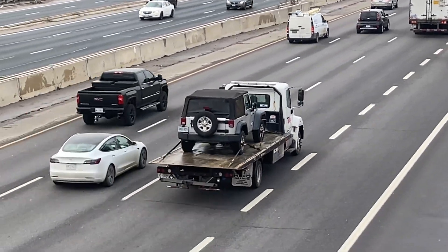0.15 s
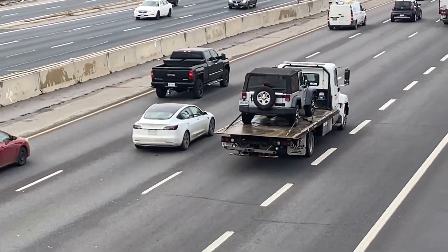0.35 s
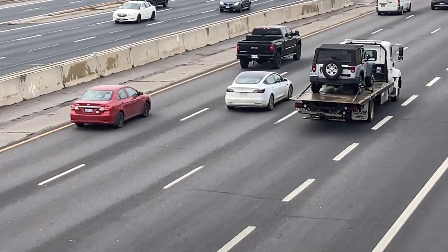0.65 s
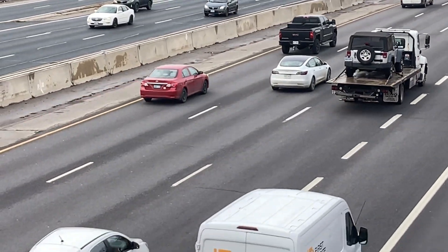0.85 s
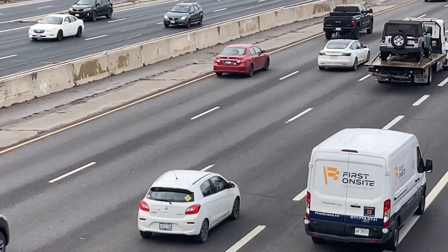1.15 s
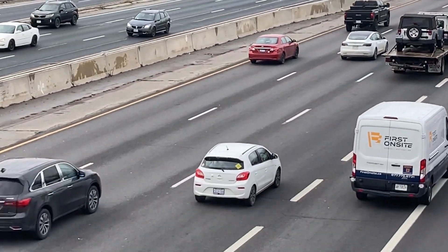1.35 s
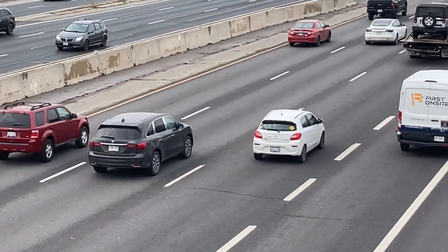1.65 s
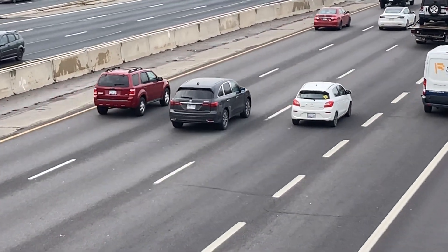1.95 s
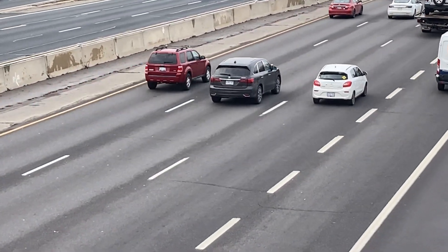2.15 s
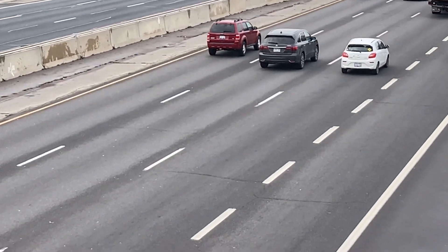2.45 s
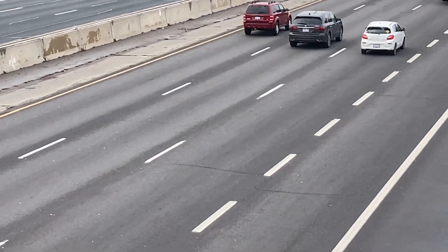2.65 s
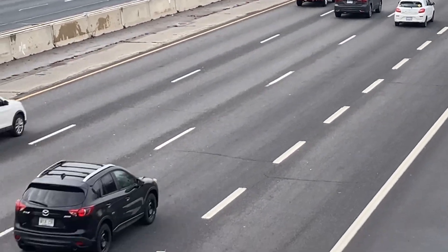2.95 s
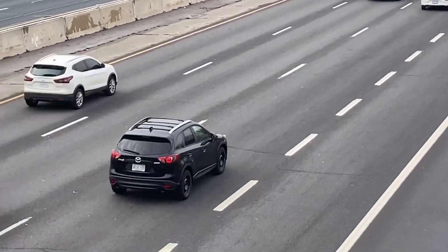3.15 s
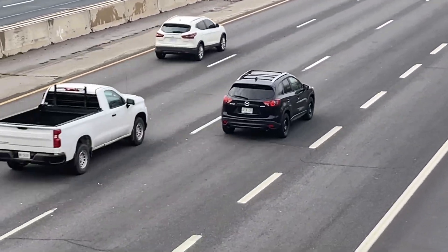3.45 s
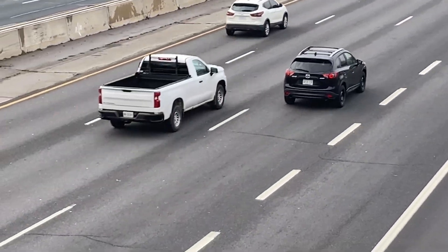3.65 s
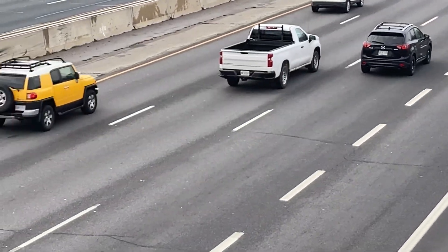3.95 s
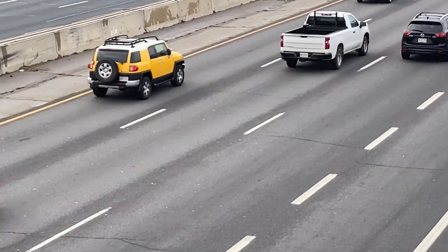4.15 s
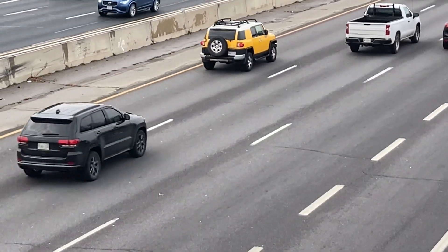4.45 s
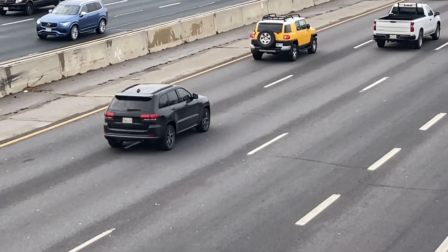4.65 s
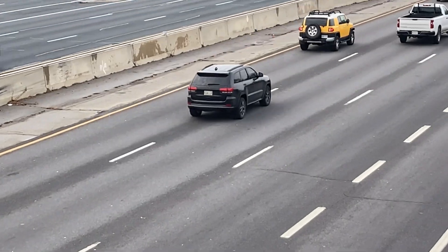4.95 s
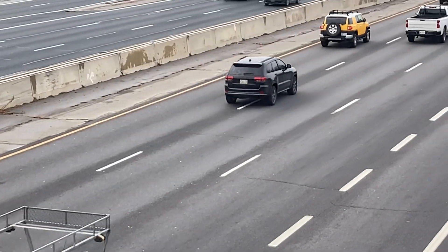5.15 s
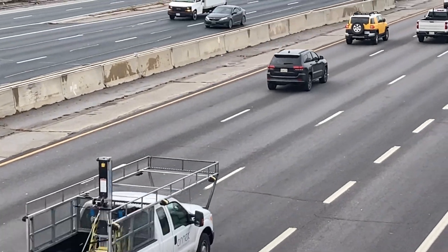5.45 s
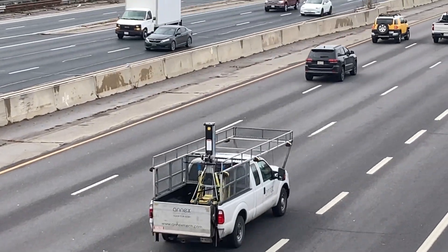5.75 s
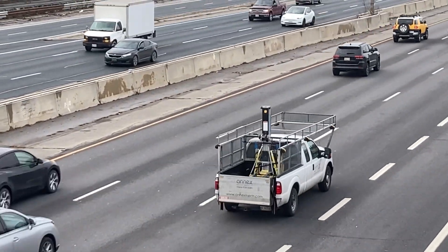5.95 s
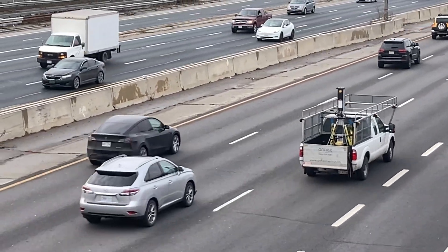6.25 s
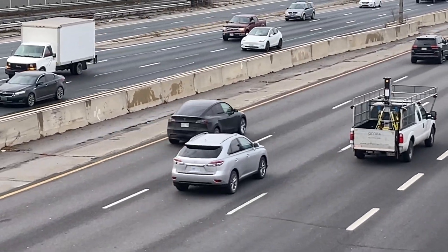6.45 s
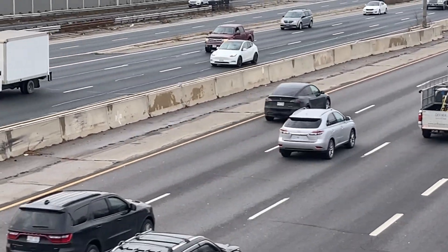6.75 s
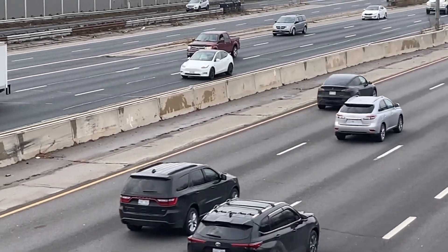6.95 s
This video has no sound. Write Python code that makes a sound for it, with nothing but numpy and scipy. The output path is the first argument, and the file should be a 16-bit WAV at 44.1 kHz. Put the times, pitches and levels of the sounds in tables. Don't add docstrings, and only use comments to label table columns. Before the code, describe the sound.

Cars rush past on a busy multi-lane highway over low exhaust rumble; a heavy truck drones away and a load rack bangs over a joint.

```python
import sys
import numpy as np
from scipy import signal
from scipy.fft import rfft, irfft, next_fast_len
from scipy.io import wavfile
from scipy.ndimage import uniform_filter1d, map_coordinates

SR = 44100
rng = np.random.default_rng(int(sys.argv[2]) if len(sys.argv) > 2 else 0)


def unload_audio(sound):
    columns = np.transpose(np.atleast_2d(sound))
    steps = np.round(np.clip(columns, -1, 1) * 32767)
    wavfile.write(sys.argv[1], SR, steps.astype(np.int16))


def voltage_ratio(level):
    return 10 ** (np.asarray(level, float) / 20)


N = 313110


def unit(x):
    return x / np.sqrt(np.mean(x ** 2) + 1e-20)


def along(points, hz):
    f, v = np.transpose(points)
    return np.interp(np.log(hz + 1), np.log(f + 1), v)


def curves(rows):
    s, *columns = np.transpose(rows)
    return [np.interp(np.arange(N) / SR, s, column) for column in columns]


def wobble(rate):
    knots = rng.standard_normal(int(N * rate / SR) + 4)
    return map_coordinates(knots, [np.arange(N) * rate / SR])


def filtered(x, response):
    m = next_fast_len(N + 8192)
    return irfft(rfft(x, m) * response(np.fft.rfftfreq(m, 1 / SR)), m)[..., :N]


def bell(t, s, span):
    return np.exp(-((t - s) / span) ** 2)


def swells(rows):
    t = np.arange(N) / SR
    return 10 * np.log10(1e-9 + sum(voltage_ratio(db) ** 2 * bell(t, s, span) for s, db, span in rows))


def rush(spectrum, patchy_db):
    z = signal.stft(rng.standard_normal((2, N)), nperseg=1024)[2]
    field = uniform_filter1d(rng.standard_normal(z.shape[1:]), size=10, axis=0)
    field = uniform_filter1d(field, size=6, axis=1)
    pair = signal.istft(z * voltage_ratio(patchy_db * unit(field)), nperseg=1024)[1][:, :N]
    closed = [(spectrum[0][0] / 2, -130), *spectrum, (spectrum[-1][0] * 2, -130)]
    return unit(filtered(pair, lambda hz: voltage_ratio(along(closed, hz))))


def drone(hz, orders, unsteady):
    turns = np.cumsum(hz * (1 + unsteady * wobble(12))) / SR
    tones = 0
    for order, db in orders:
        phase = 2 * np.pi * (order * turns + rng.random())
        tones = tones + np.sqrt(2) * voltage_ratio(db) * np.sin(phase)
    return tones


def struck(rows, attack):
    out, t = np.zeros(N + SR), np.arange(SR // 2) / SR
    for s, db, hz, t60 in rows:
        modes = [(0.92, 0.21), (1, 0.93), (1.07, 0.42)]
        ring = sum(gain * np.sin(2 * np.pi * ratio * hz * t) for ratio, gain in modes)
        envelope = voltage_ratio(db - 60 * t / t60) * (1 - np.exp(-(t / attack) ** 2))
        out[round((s - attack) * SR):][:len(t)] += envelope * ring
    return out[:N]


# (nearest t/s, level/dB, within earshot t/s, weight [-1.5 light to 1 heavy], tread [-1 fine
PASSES = [(0.0, 2, 0.13, 0.071, -0.31), (0.35, 3.5, 0.18, -0.53, 0.19), (0.65, -2, 0.17, -1.5, 0.52),
          (1.05, 1.5, 0.34, -0.28, -0.4), (1.47, -4.5, 0.032, 0, 0.42), (1.65, -3.5, .15, 0.42, -0.6),
          (2.05, -4, 0.17, 0.7, -0.17), (2.4, 0, 0.21, -0.27, -0.12), (2.7, -1, 0.16, -.5, -.4),
          (2.9, -1.5, 0.12, -0.67, .8), (3.3, 0, 0.27, -0.13, -.6), (3.6, 1.5, .15, 0.24, -0.24),
          (3.95, -6, 0.13, -0.15, 0), (4.4, -4, 0.16, 0.85, 1), (4.8, 2.5, 0.24, 0.7, .4),
          (5.1, -0.5, 0.13, 0.82, -.2), (5.45, 3, 0.21, 0.59, 0.22), (5.7, 2, 0.1, -0.059, -0.39),
          (5.9, -4.5, .1, -0.1, 0.083), (6.1, 1.5, 0.19, 0.021, -0.58), (6.4, 2, 0.13, 0.55, 0.23),
          (6.68, 0.5, 0.17, -0.36, 0.25), (7.0, 0, 0.26, 0.56, 0.89)]
LAYER_ANSWER = {"rumble": (-34.5, -38, 3.5, 0.1), "boom": (-33.5, -35.5, 4.5, -0.5),
                "carcass": (-31, -35, 4.5, -2), "tread": (-31.5, -32.5, 0, -4),
                "groove": (-28.5, -34, 0.4, 6.5), "hiss": (-41, -42.5, -4.5, -1.5),
                "air": (-75, -70.5, -2.5, -1.5)}


def traffic(layer):
    far_db, near_db, weight_db, tread_db = LAYER_ANSWER[layer]
    t = np.arange(0, N, 64)[:, None] / SR
    s, db, span, weight, tread = np.transpose(PASSES)
    vehicle_db = near_db + db + weight_db * weight + tread_db * tread
    near = voltage_ratio(vehicle_db) ** 2 * bell(t, s, span)
    level_db = 10 * np.log10(voltage_ratio(far_db) ** 2 + near.sum(axis=1))
    return np.interp(np.arange(N) / SR, t[:, 0], level_db)


# (f/Hz, level/dB per Hz)
AIR_SPECTRUM = [(7000, -30), (8500, -3), (9500, 0), (10500, -3), (11500, -9), (12500, -17), (13200, -28),
                (14000, -34), (16000, -70)]


def slipstream():
    level_db = traffic("air") + 3.5 + 0.8 * wobble(16)
    return voltage_ratio(level_db) * rush(AIR_SPECTRUM, patchy_db=2.4)


# (f/Hz, level/dB per Hz)
RUMBLE_SPECTRUM = [(20, -41.5), (33, -25), (40, -5.5), (48, 1.5), (70, 4), (130, 0), (200, 2), (260, -8.5),
                   (400, -57)]
BOOM_SPECTRUM = [(120, -74.5), (200, -4), (250, -0.5), (330, -2.5), (430, -9.5), (520, -14.5), (800, -61)]


def exhausts():
    rumble = voltage_ratio(traffic("rumble") + 6) * rush(RUMBLE_SPECTRUM, patchy_db=0)
    return rumble + voltage_ratio(traffic("boom")) * rush(BOOM_SPECTRUM, patchy_db=0.5)


# (f/Hz, level/dB per Hz)
BED_SPECTRUM = [(200, -31), (235, -3), (265, 4), (300, -6.5), (350, -30)]
# (t/s, level/dB, length t/s)
BED_SWELLS = [(4.93, -27, .07), (5.2, -31.5, .12), (5.45, -31, 0.13), (6.75, -36.5, .2)]


def load_bed():
    return voltage_ratio(swells(BED_SWELLS)) * rush(BED_SPECTRUM, patchy_db=1.5)


# (f/Hz, level/dB per Hz)
CARCASS_SPECTRUM = [(300, -35), (430, -9), (560, -1), (680, 0), (800, -7), (900, -12.5), (1400, -76)]
TREAD_SPECTRUM = [(500, -24.5), (800, -6), (1000, 2), (1200, -2), (1400, -10.5), (2000, -56.5)]
GROOVE_SPECTRUM = [(800, -47.5), (1200, -3), (1400, 1), (1600, 1), (1900, -2), (2200, -9.5), (2700, -13.5),
                   (3300, -23.5), (4500, -53.5)]
HISS_SPECTRUM = [(1800, -16), (2700, 5.5), (3300, -0.5), (4300, -2), (5000, -10), (5900, -16), (7000, -11),
                 (8200, -20), (9500, -33.5), (10500, -66)]


def tyres():
    carcass = voltage_ratio(traffic("carcass")) * rush(CARCASS_SPECTRUM, patchy_db=0.8)
    tread = voltage_ratio(traffic("tread")) * rush(TREAD_SPECTRUM, patchy_db=1.5)
    grooves = voltage_ratio(traffic("groove")) * rush(GROOVE_SPECTRUM, patchy_db=1.15)
    hiss = voltage_ratio(traffic("hiss") + 0.51 * wobble(9)) * rush(HISS_SPECTRUM, patchy_db=1.2)
    return carcass + tread + grooves + hiss


# (t/s, level/dB, length t/s)
ONCOMING_SWELLS = [(6.4, -38, .12), (6.9, -34, .2)]


def oncoming_truck():
    return drone(np.full(N, 292.5), [(1, swells(ONCOMING_SWELLS))], unsteady=0.008)


# (t/s, firing f/Hz, level/dB)
DIESEL_FIRING = [(0.0, 57.5, -36), (0.24, 58.2, -31), (1.22, 57.7, -36.5), (1.46, 61.65, -32.5),
                 (2.23, 60.8, -38), (2.35, 56.6, -39), (2.53, 61.6, -29), (3.93, 60.7, -36.5),
                 (4.11, 63.6, -30.5), (4.33, 60.8, -28.5), (5.36, 59, -21.5), (5.93, 55.6, -30.5),
                 (6.37, 55.4, -35), (6.51, 58.0, -28), (6.68, 54.6, -32), (7.1, 54.6, -33)]
# (t/s, level/dB, length t/s)
LUG_SWELLS = [(0.9, -34.5, .6), (5.1, -34.5, .35), (5.6, -29.5, 0.32)]


def diesels():
    firing_hz, firing_db = curves(DIESEL_FIRING)
    lug_db = swells(LUG_SWELLS) + 2.5 * wobble(5)
    smooth_hz = uniform_filter1d(firing_hz, size=SR // 4)
    return drone(smooth_hz, [(1, firing_db), (1.9, lug_db)], unsteady=0.01)


# (t/s, peak level/dB, f/Hz, t60/s)
AXLE_THUMPS = [(5.40, -20, 82, .35), (5.43, -23, 50, .3), (4.93, -27, 262, .3), (5.15, -28, 250, .3),
               (2.45, -32, 325, .6)]


def axle_thumps():
    return struck(AXLE_THUMPS, attack=0.0165)


# (t/s, peak level/dB, f/Hz, t60/s)
RACK_KNOCKS = [
    (4.796, -10.5, 736, 0.064),
    (4.836, -17, 862, 0.071),
    (5.067, -3.5, 732, 0.064),
    (5.394, -7, 692, 0.083),
    (5.431, -5, 619, 0.059),
]


def rack_knocks():
    return struck(RACK_KNOCKS, attack=0.005)


def rack_slaps():
    peak_db, t60, rise_s = -6, 0.056, 0.008
    low_hz, high_hz = 450, 995
    out, t = np.zeros(N + SR), np.arange(SR // 4) / SR
    shape = voltage_ratio(peak_db - 60 * t / t60) * (1 - np.exp(-(t / rise_s) ** 2))
    for s, db, *_ in RACK_KNOCKS:
        burst = voltage_ratio(db) * shape * rng.standard_normal(len(t))
        out[round((s - rise_s) * SR):][:len(t)] += burst

    def steep(x):
        return (1 + np.sqrt(2) * x + x * x) ** 2

    return filtered(out[:N], lambda hz: 3 / steep(low_hz / (1j * hz + 1)) / steep(1j * hz / high_hz))


# (t/s, level/dB, length t/s)
TRUCK_NOTE = [(1.85, -33.5, 0.2), (2.2, -21, 0.045), (2.47, -23.5, .07), (2.78, -29, .08),
              (3.05, -23.5, .1), (3.33, -17.5, .07), (3.53, -17.5, 0.084), (3.82, -19.5, 0.093),
              (4.12, -21.5, .08), (4.35, -22, 0.14), (4.65, -20, 0.099), (4.9, -20, 0.13),
              (5.3, -30, 0.076), (5.56, -21.5, .06), (5.8, -22, .11), (6.1, -27.5, 0.13),
              (6.3, -29.5, 0.086), (6.8, -30, .1), (7.0, -28.5, .15)]
# (t/s, level/dB, length t/s)
TRUCK_BLOCK = [(2.4, -29.5, 0.14), (2.83, -23, .11), (3.15, -27.5, .1), (3.45, -25.5, 0.19),
               (3.95, -27.5, .15), (4.25, -29, .12), (4.85, -31, .1), (5.1, -27, .1), (5.5, -27, .12),
               (5.75, -29, .1), (6.2, -33.5, .25), (6.8, -30, 0.31)]
# (t/s, level/dB, length t/s)
TRUCK_WHINES = [(2.5, -33.5, 0.16), (2.95, -33, .15), (3.5, -41, .15), (4.1, -38.5, .3)]


def truck():
    shaft_hz, truck_m_s, sound_m_s = 48.63, 25, 343
    nearest_s, nearest_m = 3.0, 12
    gone_m = truck_m_s * (np.arange(N) / SR - nearest_s)
    receding = gone_m / np.hypot(gone_m, nearest_m)
    heard_hz = shaft_hz / (1 + truck_m_s / sound_m_s * receding)
    block_db = swells(TRUCK_BLOCK)
    third_db = block_db - 10.5 + 2 * wobble(6)
    whine_db = swells(TRUCK_WHINES) + 4 * wobble(6)
    orders = [(2, block_db), (3, third_db), (4, swells(TRUCK_NOTE)), (6, whine_db)]
    return drone(heard_hz, orders, unsteady=0.004)


def scene():
    noise = slipstream() + exhausts() + load_bed() + tyres()
    tones = oncoming_truck() + diesels() + axle_thumps() + truck()
    rack = rack_knocks() + rack_slaps()
    return noise + rack * voltage_ratio([[0], [4]]) + tones * voltage_ratio([[0], [-3]])


def top_cut(x):
    return signal.sosfilt(signal.butter(12, 13850, fs=SR, output="sos"), x)


# (f/Hz, level/dB)
WIDTH_LOW = [(50, -13), (200, -17.5), (350, -13.5), (450, -11.5), (650, -10), (820, -2.5), (1050, -1),
             (1600, -7), (2200, -1.5)]
WIDTH_HIGH = [(2200, 0), (3000, 1), (4500, -3.5), (5800, 6.5), (7100, -12.5), (8300, 4), (9500, 3),
              (10400, -2), (11300, -23.5), (12000, -6.5), (12500, 0), (13200, 11)]
# (f/Hz, share [-1 to 1])
IN_STEP = [(50, .45), (180, .65), (270, 0.054), (450, .08), (800, .08), (1600, 0.29), (2200, 0.07),
           (3000, .6), (4000, 0.054), (6000, -0.036), (9000, 0.079)]
# (f/Hz, share [-1 to 1])
AHEAD_LOW = [(50, -0.92), (130, -0.77), (220, -.42), (340, .4), (430, .45), (700, -.6), (900, .6),
             (1200, .82), (1500, .45), (1800, -.28), (2150, .25)]
AHEAD_HIGH = [(2150, .25), (2650, -.38), (3100, 0), (4500, -.15), (5700, .3), (6600, -.1), (7800, -.75),
              (9000, 0), (10000, .4), (12000, -.3)]


def record(dry):
    direct, scattered = dry

    def width(hz):
        return voltage_ratio(along(WIDTH_LOW + WIDTH_HIGH[1:], hz))

    def tied(hz):
        return along(IN_STEP, hz) + 1j * along(AHEAD_LOW + AHEAD_HIGH[1:], hz)

    def free(hz):
        return np.sqrt(np.clip(1 - abs(tied(hz)) ** 2, 0, 1))

    def notch(hz):
        centre_hz, width_hz, depth_db = 9240, 750, -10.5
        return voltage_ratio(depth_db * np.exp(-((hz - centre_hz) / width_hz) ** 2))

    side = filtered(direct, lambda hz: width(hz) * tied(hz))
    side = side + filtered(scattered, lambda hz: width(hz) * free(hz))
    mid = filtered(direct, notch)
    return top_cut(np.array([mid + side, mid - side]))


dry = scene()
out = record(dry)
unload_audio(out)
```